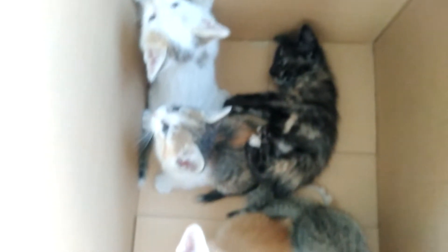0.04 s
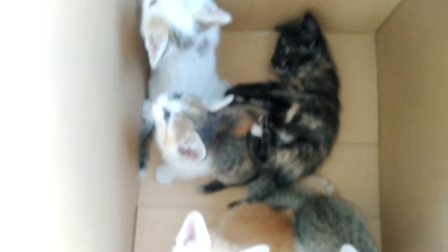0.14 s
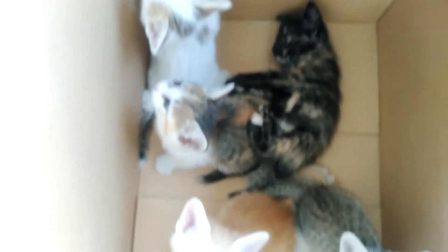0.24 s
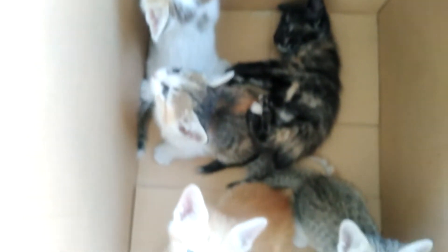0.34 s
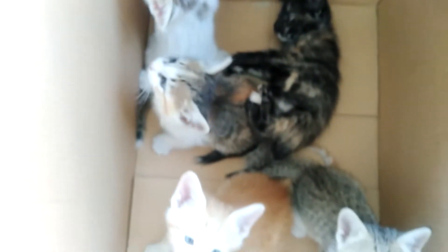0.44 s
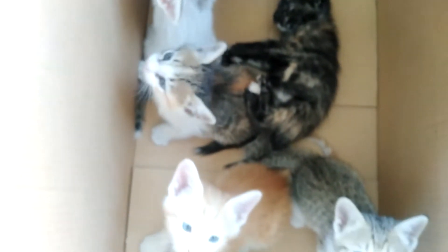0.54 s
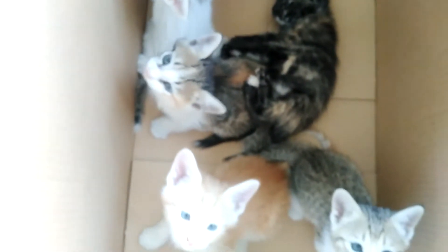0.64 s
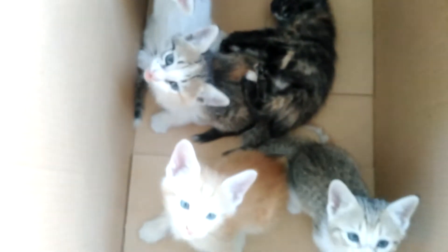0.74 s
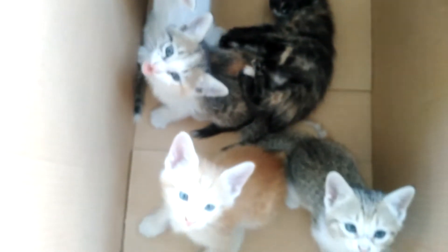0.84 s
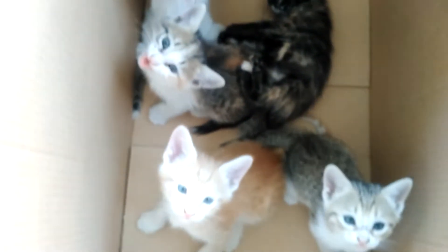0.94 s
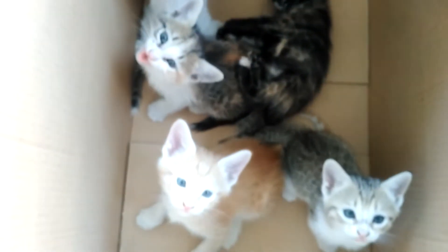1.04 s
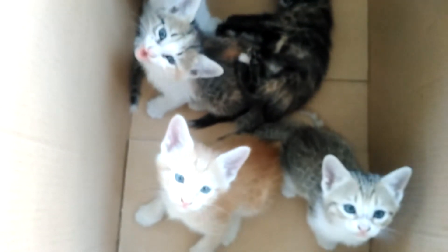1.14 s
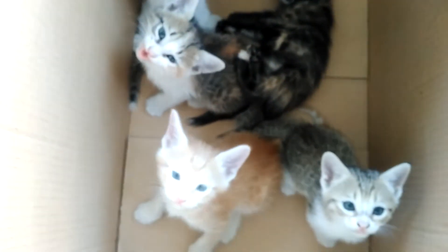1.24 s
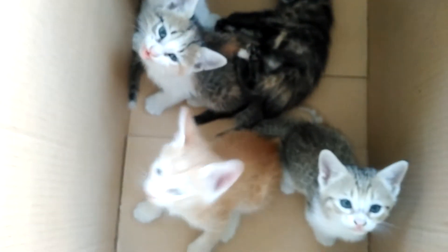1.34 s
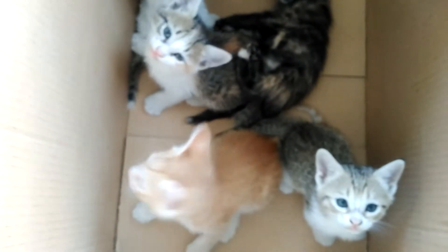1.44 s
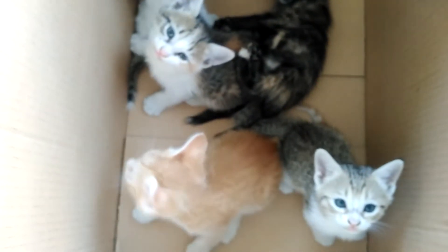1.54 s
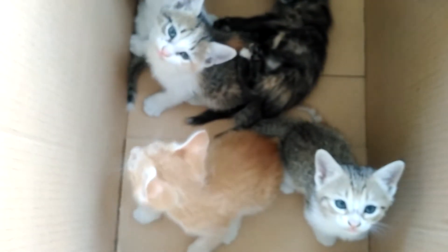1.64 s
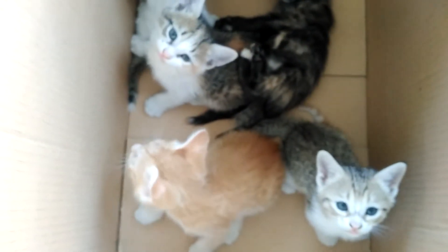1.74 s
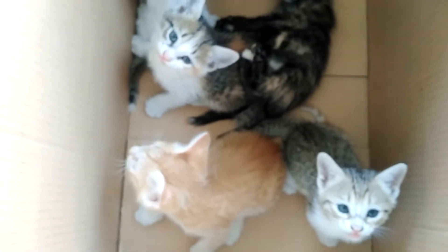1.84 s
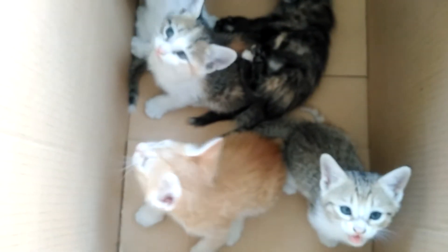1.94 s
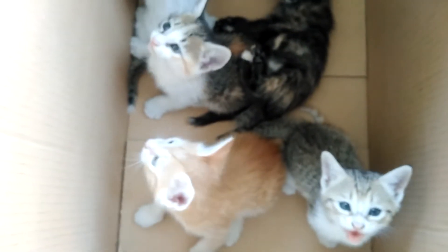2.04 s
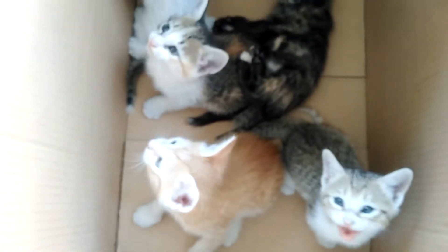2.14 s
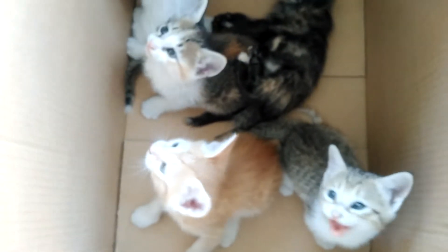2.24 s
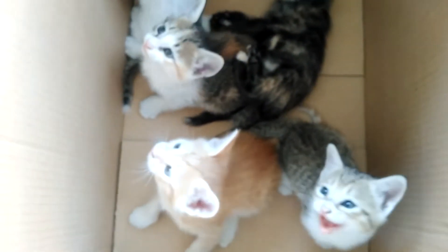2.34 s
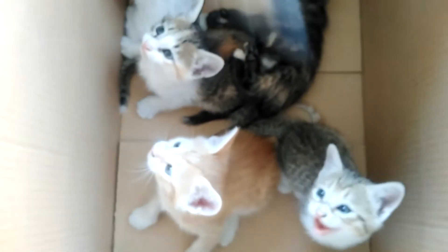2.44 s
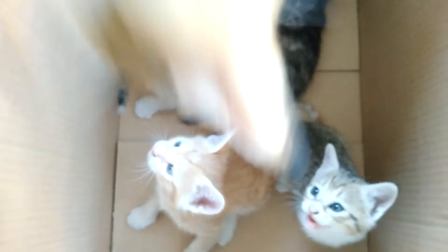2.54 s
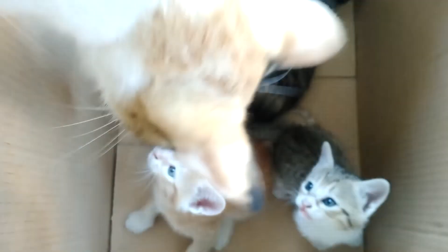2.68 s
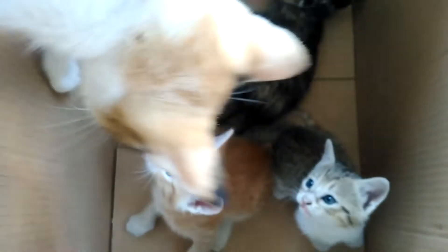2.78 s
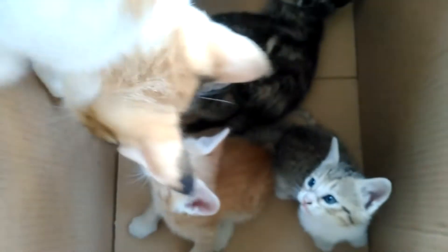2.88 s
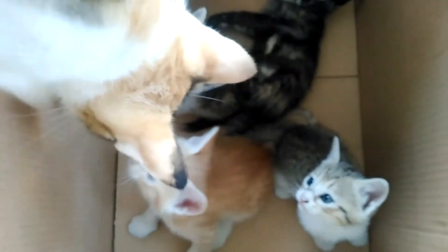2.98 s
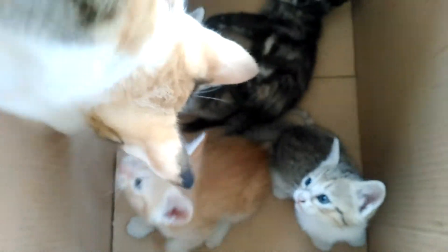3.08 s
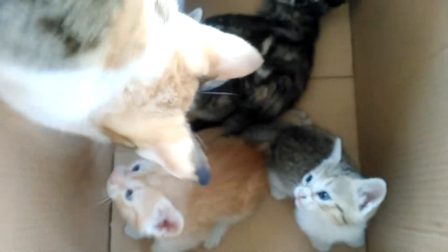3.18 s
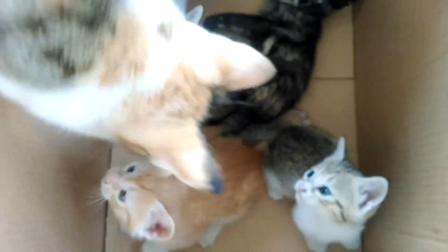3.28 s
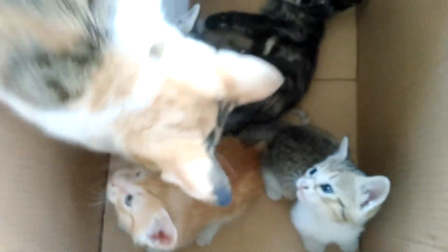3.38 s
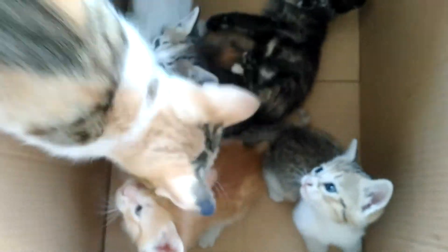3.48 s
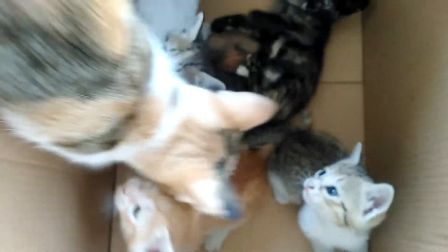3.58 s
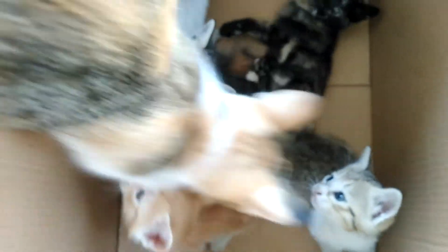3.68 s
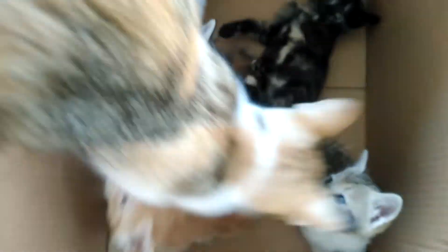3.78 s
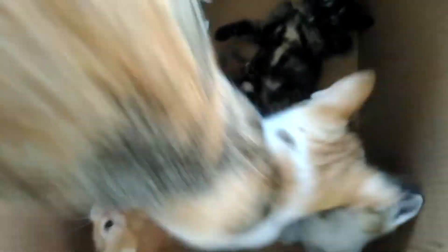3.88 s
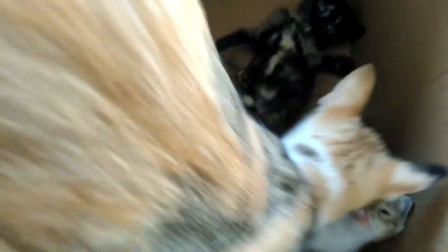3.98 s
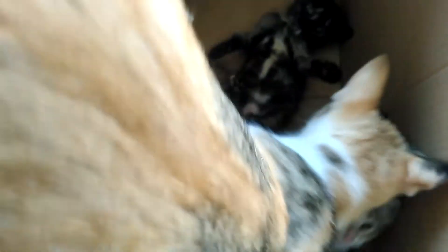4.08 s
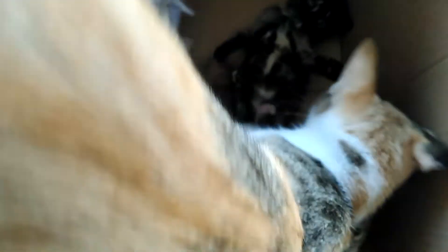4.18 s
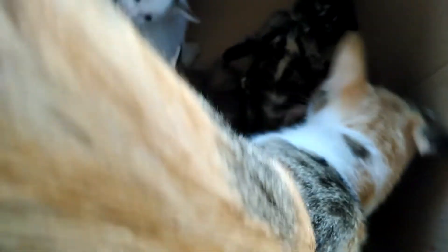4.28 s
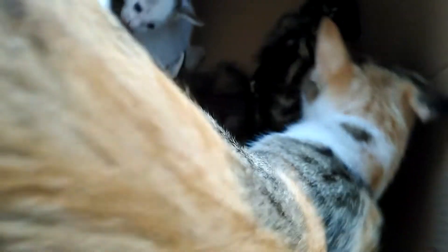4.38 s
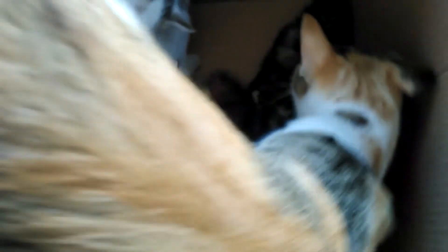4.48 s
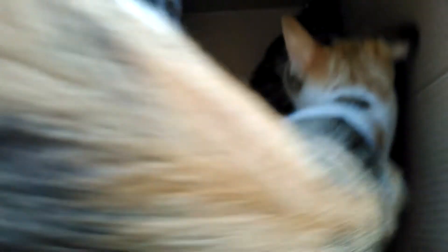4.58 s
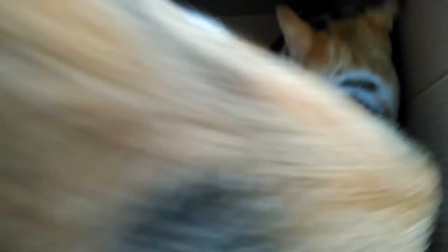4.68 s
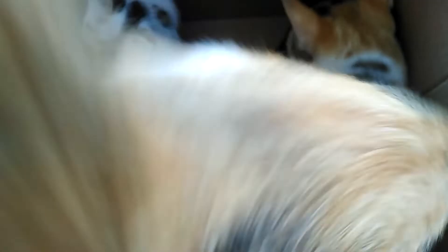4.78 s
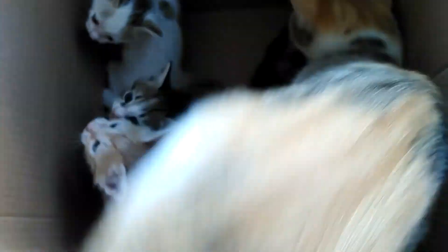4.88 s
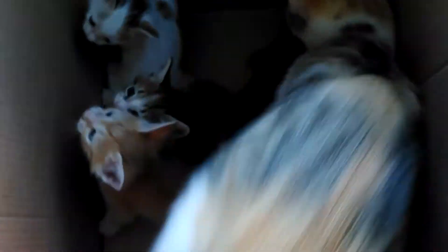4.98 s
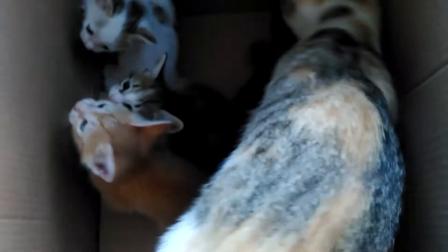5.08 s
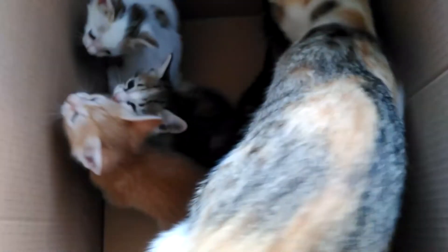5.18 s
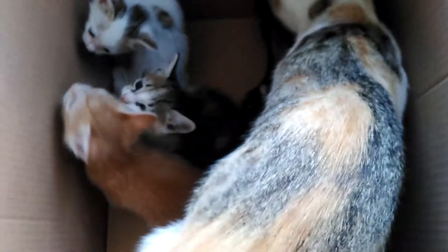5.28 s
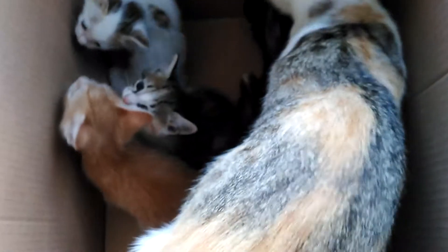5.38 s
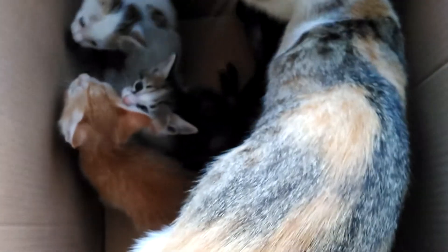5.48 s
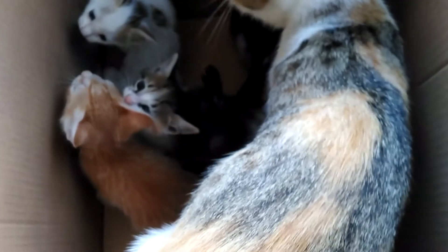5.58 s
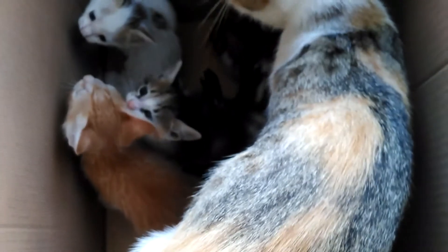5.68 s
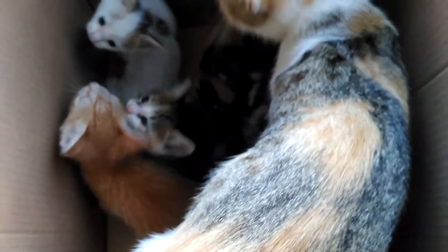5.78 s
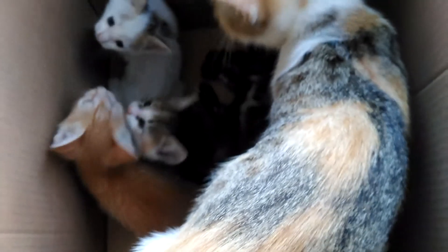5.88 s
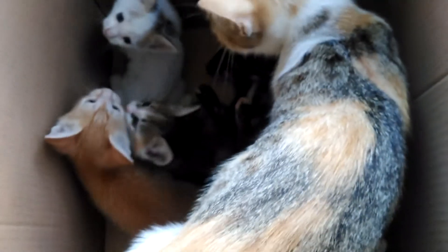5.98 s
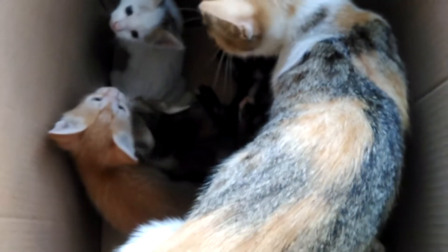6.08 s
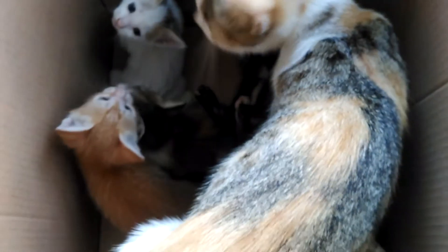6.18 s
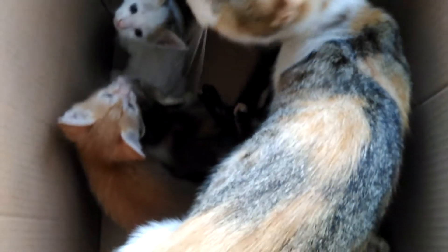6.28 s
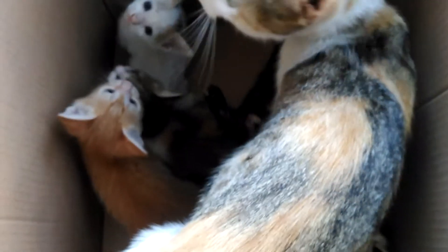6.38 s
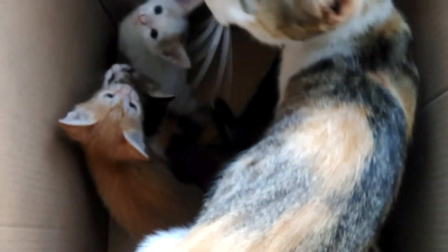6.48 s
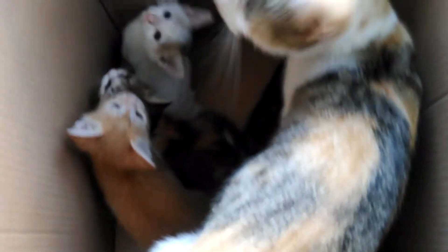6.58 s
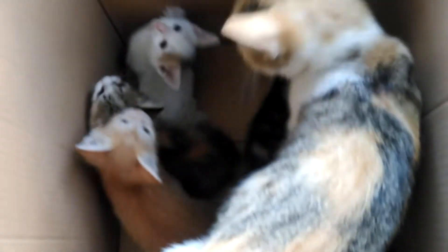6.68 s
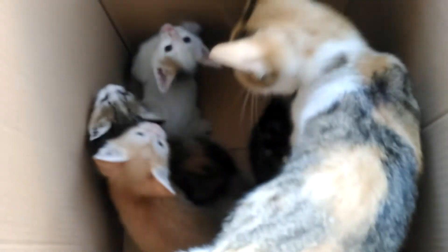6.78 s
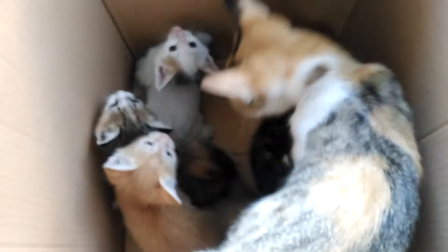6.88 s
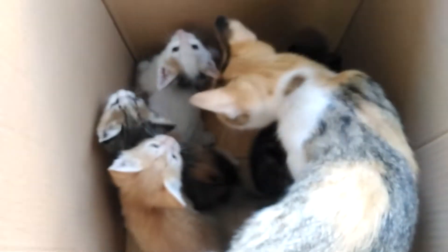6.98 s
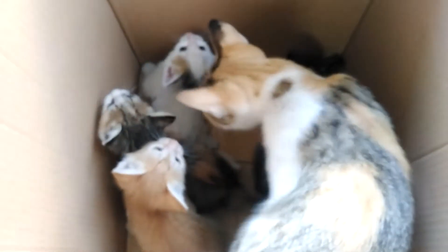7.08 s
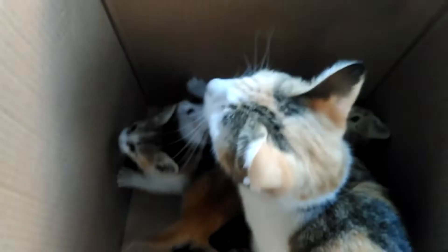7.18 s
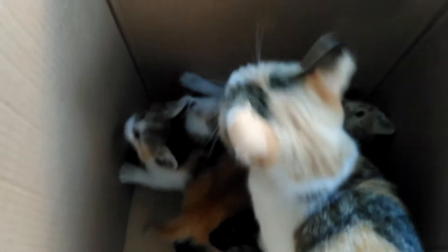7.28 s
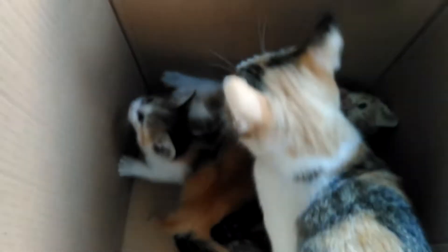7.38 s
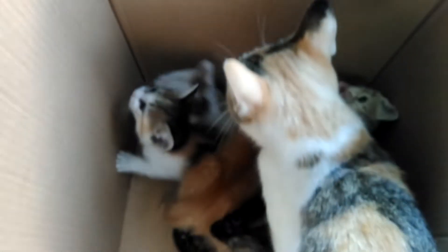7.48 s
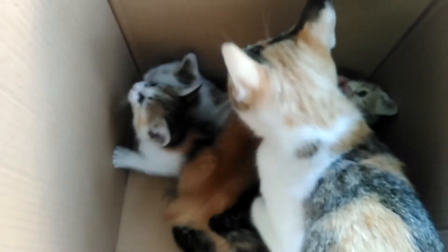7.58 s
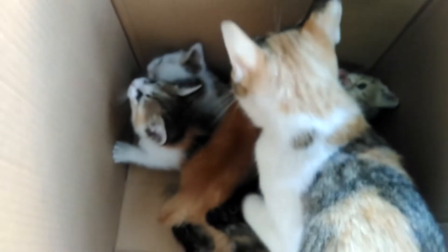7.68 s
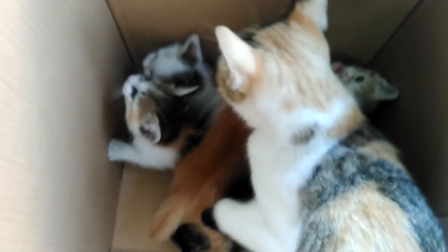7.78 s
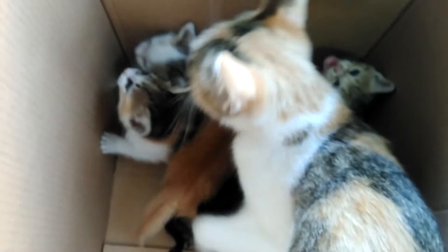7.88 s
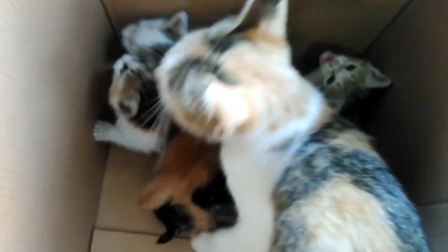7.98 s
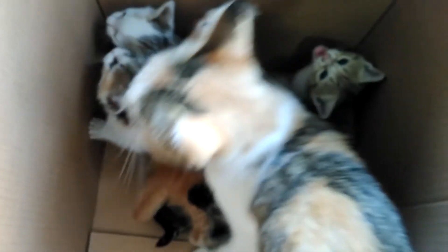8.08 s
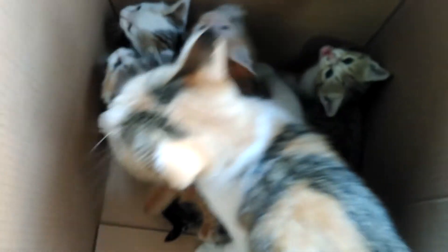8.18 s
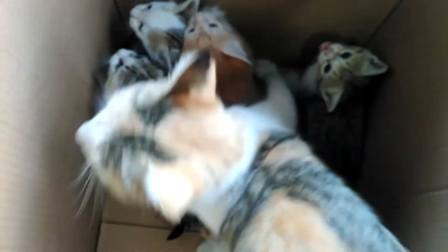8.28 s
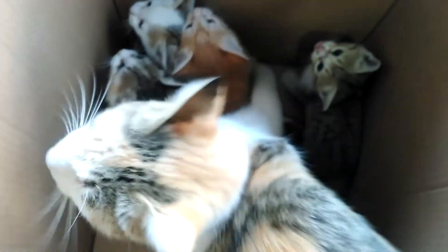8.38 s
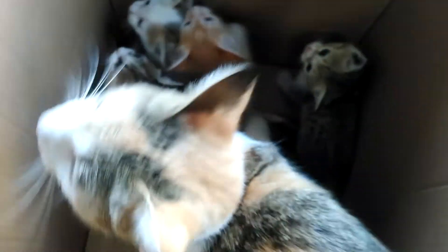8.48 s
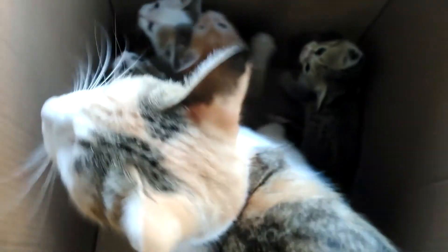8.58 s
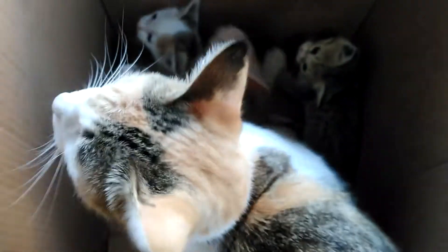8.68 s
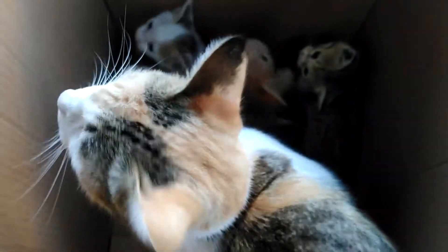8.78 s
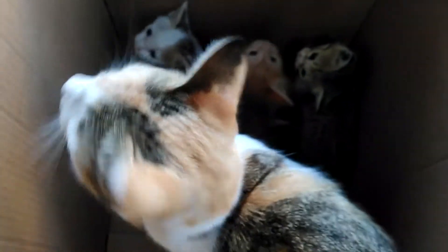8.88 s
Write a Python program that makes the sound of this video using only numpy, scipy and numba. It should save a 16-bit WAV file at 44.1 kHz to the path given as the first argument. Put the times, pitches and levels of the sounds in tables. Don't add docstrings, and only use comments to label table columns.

```python
import sys
import numpy as np
from scipy import signal
from scipy.io import wavfile
from scipy.ndimage import uniform_filter1d
from numba import njit

SR = 44100
rng = np.random.default_rng(int(sys.argv[2]) if len(sys.argv) > 2 else 0)


def rack_gain(trim_db):
    fader = np.asarray(trim_db, float)
    return 10 ** (fader / 20)


def bounce(signal):
    frames = np.transpose(np.atleast_2d(signal))
    limited = np.clip(frames, -1, 1)
    pcm = np.round(limited * 32767).astype(np.int16)
    wavfile.write(sys.argv[1], SR, pcm)


N = 393813
T = np.arange(N) / SR


def unit(x):
    return x / np.sqrt(np.mean(x ** 2))


@njit
def svf(x, hz, width):
    y, band, low = np.empty(len(x)), 0., 0.
    for i in range(len(x)):
        g, damping = np.tan(np.pi * hz[i] / SR), width / hz[i]
        v = (band + g * (x[i] - low)) / (1 + g * (g + damping))
        band, low = 2 * v - band, low + 2 * g * v
        y[i] = damping * v
    return y


def steep(x, hz, width):
    hz = hz + np.zeros(len(x))
    once = svf(x, hz, 1.11 * width)
    return svf(once, hz, 1.11 * width)


def walk(rate, size):
    hold = max(int(SR / rate), 1)
    steps = np.repeat(rng.standard_normal(size // hold + 1), hold)
    slewed = uniform_filter1d(uniform_filter1d(steps, hold), hold)
    return 1.382 * slewed[:size]


def add(out, start, x):
    out[:, start:start + x.shape[1]] += x[:, :N - start]


def rubbing(modes, alike, flicker_db, grain_db):
    out, pressure_db = 0, flicker_db * walk(22, N)
    for hz, width, db in modes:
        slip_db = grain_db * walk(400, N) + pressure_db + np.sqrt(2) * walk(18, N)
        slips = rng.standard_normal((2, N)) * rack_gain(slip_db)
        mid, side = (unit(steep(c, hz * (1 + 0.053 * walk(4, N)), width)) for c in slips)
        difference = np.sqrt(1 - alike) * side * np.array([[1.], [-1.]])
        out = out + rack_gain(db) * np.sqrt(width) * (mid + difference)
    return out / np.sqrt(np.mean(out.mean(axis=0) ** 2))


def rustle():
    # time in seconds, hollow, scrape and hiss levels in dB.
    rub = [(0.0, -83.5, -96, -86.5), (0.771, -83, -77, -88), (0.835, -75.5, -67, -54.5),
           (0.878, -77, -78.0, -68), (1.018, -69, -75, -58.5), (1.082, -68.5, -83, -95),
           (1.217, -82, -89, -89), (1.317, -76.0, -94, -70), (1.379, -64.5, -52.5, -51),
           (1.592, -88, -96, -85), (1.634, -92, -98, -76.5), (1.662, -46, -52.5, -63),
           (1.752, -59, -69.5, -58.5), (1.936, -54.5, -54.5, -52.5), (1.991, -56, -60, -61),
           (2.079, -63, -44, -50.5), (2.183, -56, -40.5, -44.5), (2.379, -53, -57, -44.5),
           (2.426, -36.5, -38.5, -40.5), (2.538, -51.5, -54.0, -51), (2.598, -56, -51, -47.5),
           (2.65, -67, -65.5, -57), (2.841, -57, -53, -56.5), (3.013, -75, -86.5, -68),
           (3.222, -94.5, -91, -74.5), (3.304, -46.5, -54.0, -49), (3.488, -47.5, -57, -54.5),
           (3.66, -69.5, -64, -55), (3.716, -55, -56, -47), (3.803, -57, -56, -61.5),
           (3.947, -62.5, -52, -49), (4.099, -96, -67, -61), (4.151, -87, -45, -43.5),
           (4.198, -73, -61, -58.5), (4.426, -80, -69, -59), (4.474, -49, -46.0, -49.5),
           (4.661, -54, -51.5, -52), (4.749, -36.5, -38, -34.5), (4.836, -52.5, -61, -63),
           (4.889, -53, -47.5, -48), (4.965, -61, -55, -56), (4.985, -77, -58, -44.0),
           (5.049, -55, -53, -48.5), (5.247, -37, -33, -34), (5.324, -49, -47.0, -48.5),
           (5.424, -60, -67.5, -62), (5.497, -62, -61, -58.5), (5.537, -43, -30.5, -33.5),
           (5.615, -42, -52.5, -54), (6.105, -98, -95, -80), (6.293, -64, -52, -59),
           (6.453, -60, -58.5, -46), (6.625, -55, -51.5, -67), (6.733, -42.5, -42, -41),
           (6.872, -36.5, -45.0, -54), (7.008, -36.5, -30, -32), (7.041, -39, -28.5, -29.5),
           (7.084, -57, -55, -67), (7.164, -57, -59, -70), (7.2, -62, -44, -71), (7.279, -73.0, -57, -62),
           (7.311, -79, -47, -41.5), (7.417, -57.0, -61, -53.5), (7.497, -38, -34, -33.5),
           (7.535, -60, -49, -69.5), (7.635, -63, -51.5, -52.5), (7.699, -89, -52.5, -53.5),
           (8.038, -63.0, -50, -49), (8.094, -53, -37.0, -40), (8.185, -47, -36, -34.5),
           (8.341, -48, -39, -40), (8.413, -52, -51.5, -50), (8.561, -44.5, -58, -53.5),
           (8.66, -61, -53, -46), (8.752, -84, -57.5, -58), (8.872, -50, -44, -51.0),
           (8.911, -62.0, -56, -55), (8.93, -63.0, -37, -54)]
    # time in seconds, wall rumble level in dB.
    weight = [(0.0, -64), (0.343, -76), (0.399, -56.5), (0.539, -54), (1.189, -59), (1.62, -75),
              (1.644, -63), (1.684, -41.5), (2.151, -70), (2.275, -40.5), (2.379, -52), (2.442, -24),
              (2.674, -55.5), (2.778, -47), (2.814, -45.5), (3.217, -56.5), (4.633, -64), (4.769, -48),
              (4.973, -60), (4.997, -44), (5.037, -39), (5.448, -63), (5.571, -64), (6.721, -61),
              (6.876, -52), (7.822, -60), (7.942, -56.5), (7.966, -54), (8.002, -46), (8.93, -61)]
    # centre in Hz, width in Hz, level in dB.
    rumble_modes = [(69, 80, -8), (118, 46, -8), (169, 56.6, 2.5), (234.3, 51, 1)]
    # centre in Hz, width in Hz, level in dB.
    hollow_modes = [(464, 290, -14), (625, 224, 6), (850, 450, -5)]
    # centre in Hz, width in Hz, level in dB.
    scrape_modes = [(1250, 480, 6.5), (1800, 830, 7), (2584, 900, 4.5), (3600, 1800, -3)]
    # centre in Hz, width in Hz, level in dB.
    hiss_modes = [(5050, 1900, -9), (6970, 1770, -1), (9540, 3140, -9), (12000, 3000, -15.5)]
    s, *columns = np.transpose(rub)
    rumble = rack_gain(np.interp(T, *np.transpose(weight)))
    hollow, scrape, hiss = (rack_gain(np.interp(T, s, c)) for c in columns)
    hiss_balance = rack_gain(np.array([[.8], [-.8]]))
    return (rumble * rubbing(rumble_modes, alike=0.92, flicker_db=3.5, grain_db=2.5)
            + hollow * rubbing(hollow_modes, alike=0.56, flicker_db=6.5, grain_db=1.5)
            + scrape * rubbing(scrape_modes, alike=.25, flicker_db=1.9, grain_db=2.0)
            + hiss * rubbing(hiss_modes, alike=.05, flicker_db=2.0, grain_db=2.5) * hiss_balance)


def thump(db, hz):
    # mode in Hz, level in dB, time to fall 60 dB in seconds.
    wall = [(160, -18, 0.11), (238, -16.5, 0.089)]
    t = T[:int(.25 * SR)]
    ring = 0
    for mode_hz, mode_db, t60 in [(hz, 0, .07)] + wall:
        ring = ring + rack_gain(mode_db) * np.sin(2 * np.pi * mode_hz * t) * 1000 ** (-t / t60)
    ring = uniform_filter1d(np.r_[np.zeros(60), ring], int(.0015 * SR))
    return rack_gain(db) * ring / np.abs(ring).max() * rack_gain(np.array([[.9], [-.9]]))


def read(table, edge_s):
    s, *columns = np.transpose(table)
    t = T[int(s[0] * SR):int(s[-1] * SR)]
    end = s[-1] + (s[-1] > 8.9)
    edge = np.clip(np.minimum(t - t[0], end - t) / edge_s, 0, 1)
    return int(s[0] * SR), edge, [np.interp(t, s, c) for c in columns]


def ports(phase, pan_db, skew):
    side = np.tanh(pan_db * np.log(10) / 40) * np.sin(phase) + skew * np.cos(phase)
    return np.sin(phase) + np.array([side, -side])


def mew(table, pan_db):
    # frequency in Hz, level in dB.
    mouth = [(3000, 0), (4500, -6.5), (6000, 8), (7500, 4.5), (9500, -4), (12000, -6.5), (14500, -13.5)]
    mouth_hz, mouth_gain_db = np.transpose(mouth)
    start, edge, (hz, first_db, second_db, upper_db) = read(table, edge_s=.008)
    hz = uniform_filter1d(hz, int(0.024 * SR)) * (1 + .002 * walk(120.1, len(hz)))
    phase, out = 2 * np.pi * np.cumsum(hz) / SR, 0
    for k in range(1, 13):
        mouth_db = np.interp(np.log(k * hz), np.log(mouth_hz), mouth_gain_db)
        low_db = np.clip((4200 - k * hz) / 900, 0, 1) * (second_db - 14.5 - upper_db)
        reflected_db = upper_db + low_db + mouth_db + 5.63 * walk(13.86, len(hz))
        db = [first_db, second_db, reflected_db][min(k, 3) - 1]
        skew = .9 * rng.choice([-1, 1]) + 0.43 * walk(4.06, len(hz))
        gain = rack_gain(db + .8 * walk(60, len(hz))) * (k * hz < 15000)
        partial = ports(k * phase + 2 * np.pi * rng.random(), pan_db, skew)
        out = out + np.sqrt(2) * gain * partial
    return start, out * edge


def trill(table):
    start, edge, (hz, db, over_db, depth) = read(table, edge_s=0.0081)
    flutter = 2 * np.pi * np.cumsum(34.0 * (1 + 0.106 * walk(12.2, len(hz)))) / SR
    swing = 1 + 0.089 * np.sin(flutter + 1.41) + 0.01885 * walk(79.7, len(hz))
    phase = 2 * np.pi * np.cumsum(hz * swing) / SR
    throb = 1 - depth * (1 + np.cos(flutter)) / 2
    overtones = (ports(2 * phase, 1.5, 0.55) + 0.5 * ports(3 * phase, 1.5, 0.94)
                 + 0.07 * ports(4 * phase, 0, .8))
    tone = ports(phase, 1.5, 0.18) + rack_gain(over_db) * overtones
    return start, 2.1 * tone * throb * rack_gain(db + 2 * walk(37.8, len(hz))) * edge


def hoarse(table):
    start, edge, (hz, db, rough, low_hz, high_hz) = read(table, edge_s=0.016)
    phase = 2 * np.pi * np.cumsum(hz * (1 + .03 * rough * walk(150, len(hz)))) / SR
    slaps = sum(ports(k * phase, 0, 2.0 * np.cos(2.9 * k)) for k in range(2, 30)) / 4
    breath = rng.standard_normal((2, len(hz))) * (1 + 0.54 * np.cos(phase))
    source = (1 - rough) * slaps + 1.2 * rough * breath
    voice = []
    for c in source:
        first = steep(c, low_hz, 390.0)
        second = steep(steep(c, high_hz, 1300.), high_hz, 1300.)
        between = steep(c, (low_hz + high_hz) / 2, 503.0)
        voice.append(first - 1.14 * second + .5 * between)
    return start, unit(np.array(voice)) * rack_gain(db) * edge


def tick(db, hz):
    t = T[:int(.012 * SR)]
    crack = np.sin(2 * np.pi * hz * t) + .5 * rng.standard_normal((2, len(t)))
    return 0.59 * crack * np.minimum(t / 0.00051, 1) * 1000 ** (-t / .012) * rack_gain(db)


def room(near):
    t = T[:int(.25 * SR)]
    tail = rng.standard_normal((2, len(t))) * 1000 ** (-t / .22) * (t > .004)
    return rack_gain(-40) * signal.fftconvolve(near, tail, axes=1)[:, :N]


def masked(x, under_db, rest_db):
    hz, _, bins = signal.stft(x, SR, nperseg=1024)
    power = uniform_filter1d(uniform_filter1d(np.abs(bins) ** 2, size=4, axis=1), size=2, axis=2)
    neighbours = uniform_filter1d(power * (hz > 900)[:, None], size=100, axis=1)
    middle = ((hz > 1800) & (hz < 6000))[:, None]
    muted = (power < neighbours * rack_gain(2 * under_db)) & middle
    return signal.istft(np.where(muted, rack_gain(rest_db), 1) * bins, SR, nperseg=1024)[1][:, :N]


def scene():
    # start in seconds, peak in dB, main wall mode in Hz.
    thumps = [
        (0.402, -42, 163),
        (0.517, -37.5, 203),
        (1.662, -25, 220),
        (2.419, -22, 242),
        (2.752, -15.5, 129),
        (5.011, -20.5, 162),
        (7.981, -27, 195),
    ]
    # time in seconds, pitch in Hz, first, second and upper partial levels in dB.
    mews = [
        [(0.85, 2284, -46.5, -66, -56), (0.9, 2505, -47.5, -62, -59), (0.935, 2435, -38, -59, -56),
         (0.965, 2404, -39, -77, -81)],
        [(1.855, 1263, -36.5, -53, -82), (1.9, 1216, -42.5, -50, -53), (1.95, 1307, -44, -48.5, -56.5),
         (2.0, 1329, -46.5, -41.5, -60.5), (2.22, 1303, -42.5, -41, -62), (2.3, 1308, -47.5, -42.5, -58.5),
         (2.43, 1145, -40, -48, -67), (2.45, 923, -52, -61, -66), (2.47, 785, -35.5, -37, -65)],
        [(3.69, 630, -49, -63, -66), (3.73, 470, -52, -63, -87), (3.78, 610, -50, -50, -80),
         (3.82, 880, -70, -65, -77), (3.85, 1052, -54, -50, -63.5), (3.9, 1140, -51.5, -65, -60.5),
         (4.05, 1224, -49, -58.5, -64), (4.35, 1170, -51.5, -45, -63.5), (4.42, 1106, -52.5, -52, -63),
         (4.46, 1022, -62, -52, -90), (4.48, 937, -39, -55, -66)],
        [(6.13, 566, -50, -75, -86.5), (6.2, 776, -50, -66, -84), (6.25, 1092, -50, -88, -78),
         (6.285, 1372, -49.5, -55, -92), (6.31, 1480, -35.5, -55, -63), (6.35, 1616, -43, -42, -61.5),
         (6.4, 1515, -40.5, -47.5, -53), (6.46, 1559, -37.5, -29.5, -55), (6.55, 1452, -37, -23.5, -55.5),
         (6.62, 1499, -36.5, -35, -58.5), (6.68, 1428, -41, -34.5, -56), (6.7, 1301, -50, -33, -62),
         (6.73, 1226, -56, -67, -80)],
        [(7.215, 1077, -51, -41.5, -70), (7.35, 1104, -55, -43.5, -76), (7.42, 1045, -49.5, -44, -55.5),
         (7.48, 1066, -61.5, -48, -55), (7.55, 1098, -48.5, -47, -66.5), (7.66, 1218, -53.5, -47.5, -69),
         (7.69, 1300, -42, -58, -78)],
        [(8.42, 651, -48, -65, -76), (8.48, 644.5, -45, -50, -83), (8.52, 792, -60, -43, -89),
         (8.55, 946, -38, -53, -89), (8.6, 1217, -44.5, -43, -79), (8.7, 1340, -43, -35.5, -56.5),
         (8.85, 1400, -35, -35.5, -52.5), (8.929, 1342, -39, -28, -52)],
        [(0.945, 1716, -46, -45, -53.5), (1.02, 1818, -41, -54, -60.5), (1.05, 1722, -50.5, -50, -57.5),
         (1.17, 1591, -36, -45, -62), (1.3, 1437, -34, -65, -64.5), (1.335, 1362, -35.5, -53.5, -64),
         (1.365, 1230, -44, -62.5, -75.5), (1.38, 902, -45.5, -58, -80), (1.395, 850, -42, -61, -73)],
        [(2.27, 1272, -34, -38, -67), (2.32, 1315, -44, -38.5, -59), (2.38, 1320, -57.5, -35, -80),
         (2.45, 1298, -47.5, -41.5, -65), (2.48, 1238, -48, -43, -63), (2.51, 1104, -43, -67, -59)],
        [(6.63, 768, -56, -56, -67), (6.68, 1184, -55, -57, -66), (6.72, 1386, -48, -60, -65),
         (6.78, 1317, -50, -61, -56), (6.9, 1225, -49, -57, -61), (6.97, 1260, -42, -41, -54),
         (7.05, 1250, -39.5, -42, -59.5), (7.19, 1152, -49, -42.5, -60), (7.215, 1023, -35, -44, -78)],
        [(0.82, 1620, -51, -46, -80), (0.835, 1644, -50, -51, -62), (0.85, 1860, -55, -59, -75)],
        [(1.93, 1736, -46, -65, -80), (1.95, 1827, -45.5, -61, -80), (1.98, 1690, -49, -73, -87),
         (2.02, 1790, -50, -63, -49)],
        [(6.55, 768, -53, -58, -67), (6.63, 1396, -62, -59, -80)],
        [(7.05, 789, -48, -48, -76), (7.1, 787, -45.5, -56, -76), (7.2, 740, -51, -57, -86)],
    ]
    seats_db = [-6.5, -2, 0.5, -3, -1.5, -1, 0.5, 2, 2, 3, 7, -7, 1]
    # time in seconds, pitch in Hz, level in dB, overtones in dB,
    # throb depth from 0 to 1.
    trills = [
        [(1.775, 641, -51.5, -6, .8), (1.88, 548, -46, -5, 0.46), (1.935, 515, -54, -5, .4)],
        [(3.255, 550, -45, -5, 0.73), (3.38, 547, -46.5, -3.5, 0.85), (3.44, 548, -58, -5, .7)],
        [(3.462, 553, -37.5, -2, 0.2), (3.486, 392, -40, -14, 0.44), (3.535, 466, -47.5, -21, 0.3)],
        [(5.34, 598, -54.5, 3, 0.66), (5.5, 555, -44, -0.5, 0.16), (5.62, 521.4, -39.5, -8.5, 0.8),
         (5.83, 485.5, -40, -16.5, 0.54), (5.87, 475, -59.5, -18, .4)],
        [(6.5, 618.6, -54.5, -5, 0.57), (7.06, 628, -45.5, -3, 0.4)],
        [(7.905, 549, -49.5, -12, 0.4), (7.965, 412, -56, -12, .3)],
    ]
    # time in seconds, pulse rate in Hz, level in dB, roughness from 0 to 1,
    # first and second throat resonances in Hz.
    cries = [
        [(2.0, 329.6, -50, 1, 1100, 3540), (2.07, 330.3, -47.5, .7, 1580, 3870),
         (2.24, 319.4, -34.5, 0.49, 1650, 3500), (2.31, 337, -30.5, .3, 2000, 3630),
         (2.4, 325.8, -32, .4, 2000, 3530), (2.44, 309, -36, 0.6, 1800, 3050)],
        [(7.66, 517, -42, 0.95, 1560, 3000), (7.8, 495, -41, .55, 1480, 3200),
         (8.0, 469, -43.5, 0.796, 1470, 2860), (8.1, 467, -44, 0.65, 1520, 2870)],
    ]
    # start in seconds, peak in dB, ring in Hz.
    ticks = [(2.755, -34, 1290), (2.787, -32, 1550), (2.84, -22.5, 767), (3.684, -29.5, 7550),
             (4.47, -32, 834), (4.981, -17, 1264), (5.322, -17.5, 7390), (7.213, -18, 1640),
             (7.497, -19, 1950), (7.579, -40, 2240), (8.294, -15.5, 6760)]
    near = np.zeros((2, N))
    for call, pan_db in zip(mews, seats_db):
        add(near, *mew(call, pan_db))
    for voice, calls in [(trill, trills), (hoarse, cries)]:
        for call in calls:
            add(near, *voice(call))
    for s, *row in ticks:
        add(near, int(s * SR), tick(*row))
    near = near + room(near)
    for s, *row in thumps:
        add(near, int(s * SR), thump(*row))
    return near + rustle() + rack_gain(-101) * rng.standard_normal((2, N))


def roll_off(x):
    return signal.sosfilt(signal.butter(12, 15350, fs=SR, output="sos"), x)


def record(dry):
    dry = signal.sosfilt(signal.butter(2, 65, "high", fs=SR, output="sos"), dry)
    dry = signal.sosfilt(signal.ellip(10, .3, 60, 14400, fs=SR, output="sos"), dry)
    mix = masked(dry, under_db=-15, rest_db=-25)
    return roll_off(mix)


dry = scene()
out = record(dry)
bounce(out)
```